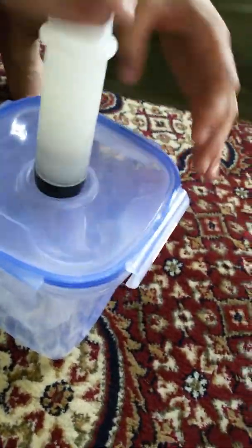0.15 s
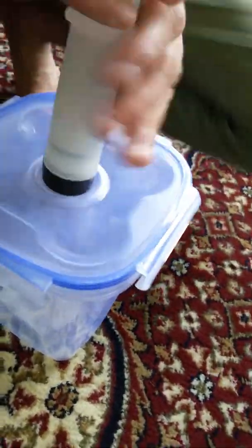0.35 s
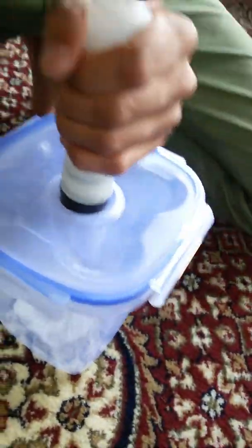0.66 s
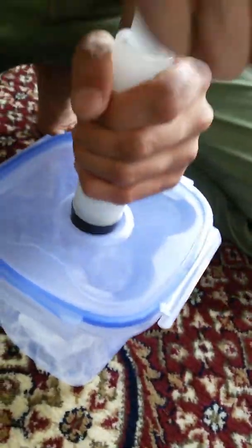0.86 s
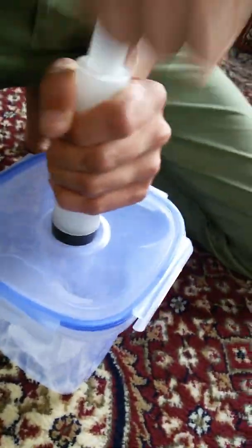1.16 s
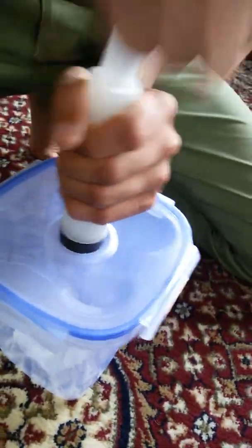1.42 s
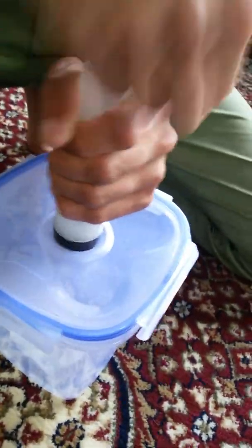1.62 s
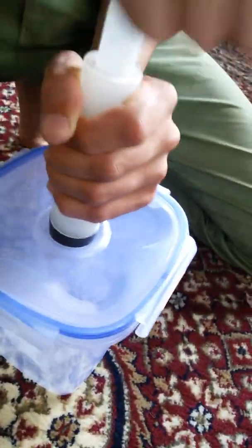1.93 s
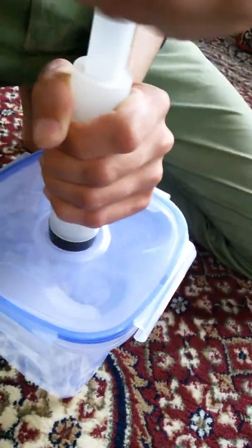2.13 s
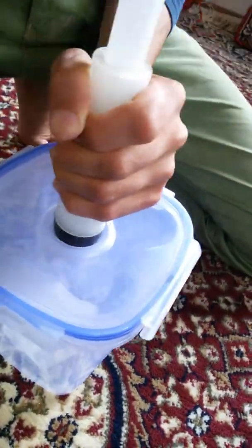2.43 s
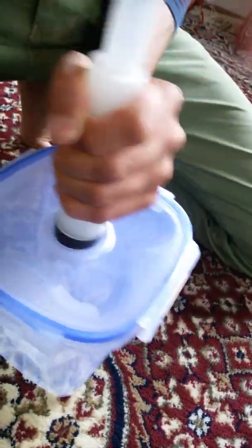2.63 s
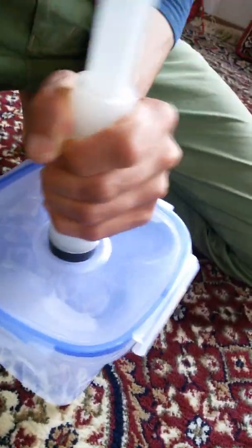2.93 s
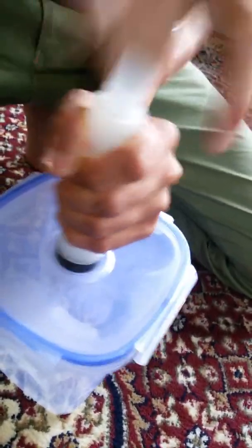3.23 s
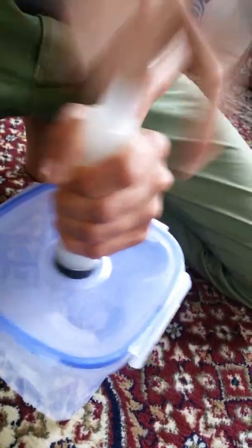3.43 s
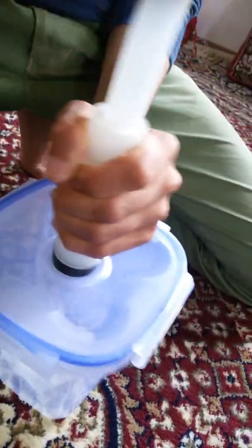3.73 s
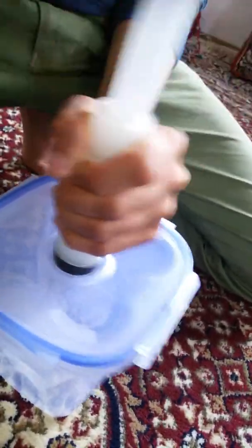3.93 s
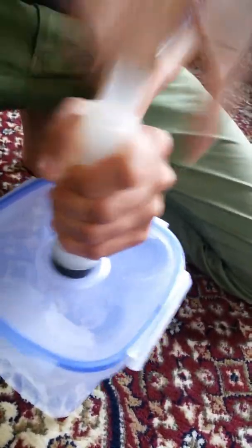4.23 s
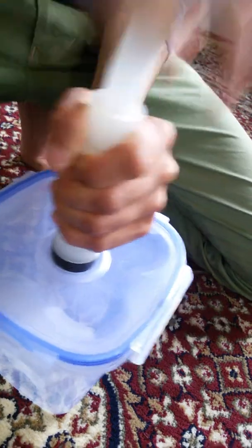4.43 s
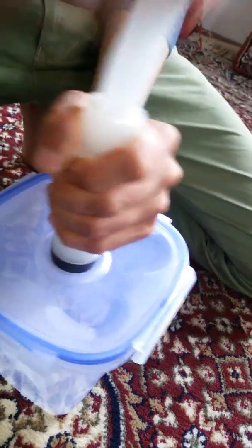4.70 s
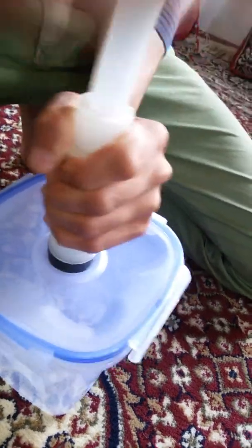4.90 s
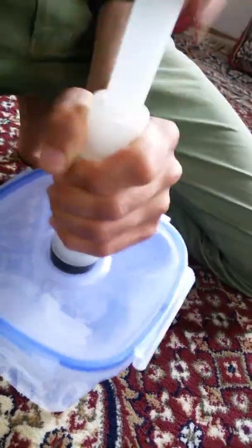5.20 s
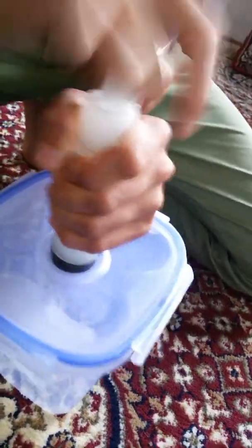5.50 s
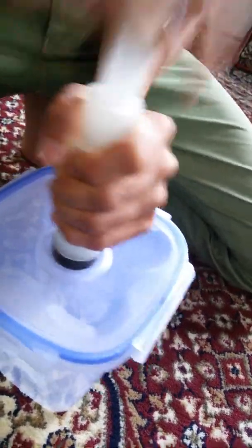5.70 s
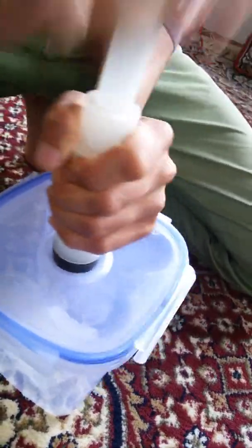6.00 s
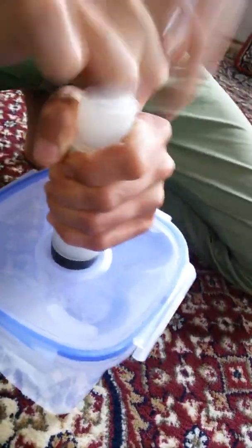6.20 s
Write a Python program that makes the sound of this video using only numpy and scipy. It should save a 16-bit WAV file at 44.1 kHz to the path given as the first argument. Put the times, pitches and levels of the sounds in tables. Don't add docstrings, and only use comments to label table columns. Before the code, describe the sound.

A hand vacuum pump on a hollow plastic box: handling knocks, a few slow strokes, then rapid rasping air hisses with sharp plastic knocks, close indoors.

```python
import sys
import numpy as np
from scipy import signal
from scipy.fft import rfft, irfft
from scipy.io import wavfile
from scipy.ndimage import uniform_filter1d, map_coordinates

SR = 44100
rng = np.random.default_rng(int(sys.argv[2]) if len(sys.argv) > 2 else 0)


def transcribe(u):
    v = np.clip(np.atleast_2d(u).T, -1, 1)
    q = np.round(v * 32767).astype(np.int16)
    wavfile.write(sys.argv[1], SR, q)


def gain_from_db(level_db):
    decades = np.asarray(level_db, float) / 20
    return 10 ** decades


N = 280198
TIME = np.arange(N) / SR

# valve_s, pull_length_s, push_hiss_db, valve_db, pull_hiss_db
STROKES = [(1.079, .098, -44, -42, -27.5), (1.33, 0.12, -44, -43, -31.5), (1.584, 0.1, -44, -44, -31.5),
           (1.817, .095, -44, -37.5, -34), (2.545, 0.091, -44, -38.5, -24.5),
           (2.778, 0.094, -41, -38.5, -24), (2.99, 0.085, -39.5, -37, -26.5),
           (3.195, 0.093, -40, -40.5, -26.5), (3.396, 0.088, -40.5, -36.5, -20),
           (3.605, 0.084, -41, -39.5, -26.5), (3.798, 0.084, -42, -35.5, -20),
           (4.003, 0.086, -38, -38, -24), (4.201, 0.079, -41.5, -35.5, -23), (4.383, 0.083, -40, -35, -23),
           (4.577, .076, -40.5, -35.5, -22.5), (4.758, 0.075, -41, -34.5, -21.5),
           (4.95, 0.08, -38, -33, -21.5), (5.128, 0.079, -36, -28.5, -21),
           (5.31, 0.075, -34.5, -30.5, -23.5), (5.49, 0.079, -37.5, -31, -21),
           (5.668, 0.075, -42.5, -33, -24), (5.849, 0.075, -40, -35.5, -26), (6.032, 0.083, -41, -38, -24),
           (6.213, 0.078, -42.5, -40.5, -26)]
# start_s, suction (0-1)
SUCTION = [(0, 0), (2.1, 0), (2.4, 1)]


def unit(x):
    return x / np.sqrt(np.mean(x ** 2) + 1e-20)


def along(points, hz):
    f, v = np.transpose(points)
    return np.interp(np.log(hz + 1), np.log(f + 1), v)


def wobble(rate_hz):
    return map_coordinates(rng.standard_normal(int(N * rate_hz / SR) + 4), [TIME * rate_hz])


def bumps(peaks, hz, depth=0):
    power = 0
    for centre_hz, width_hz, db, *rise in peaks:
        moved_hz = centre_hz * (1 + sum(rise) * depth)
        power = power + gain_from_db(2 * db) / (1 + (2 * (hz - moved_hz) / width_hz) ** 2)
    return power


def noise(gain, patchy_db, size=256):
    hz, t, z = signal.stft(rng.standard_normal(N), SR, nperseg=size)
    field = uniform_filter1d(rng.standard_normal(z.shape), size=3, axis=0)
    field = uniform_filter1d(field, size=4, axis=1)
    shape = gain(hz[:, None], t) * np.ones(z.shape)
    shape = shape / np.sqrt(np.mean(shape ** 2, axis=0))
    return unit(signal.istft(z * shape * gain_from_db(patchy_db * unit(field)), SR, nperseg=size)[1][:N])


def add(track, s, sound):
    part = track[round(s * SR):][:len(sound)]
    part += sound[:len(part)]


def ring(modes, t, attack_s):
    tones = 0
    for hz, t60_s, db in modes:
        hit_hz = hz * (1 + rng.normal(0, .012))
        tones = tones + gain_from_db(db - 60 * t / t60_s) * np.sin(2 * np.pi * hit_hz * t)
    return tones * (1 - np.exp(-(t / attack_s) ** 2))


def by_suction(pair, s):
    return pair[0] + pair[1] * np.interp(s, *np.transpose(SUCTION))


def still_air():
    # hz, db_per_hz
    floor = [(25, -29), (60, -13.5), (130, -2.5), (450, -25.5), (1600, -9), (4700, -16), (10000, -19),
             (14500, -17.5)]
    return gain_from_db(-62) * noise(lambda hz, t: gain_from_db(along(floor, hz)), patchy_db=-1.5, size=2048)


def room(x):
    # hz, t60_s
    decay = [(200, 0.4), (500, 0.37), (1200, 0.31), (4000, 0.12), (10000, 0.29)]
    out, step = np.zeros(N), SR // 8
    for start in range(0, N, step):
        hz, t, z = signal.stft(rng.standard_normal(SR // 2), SR, nperseg=256)
        tail = signal.istft(z * gain_from_db(-60 * t / along(decay, hz)[:, None]), SR, nperseg=256)[1]
        stretch = x[start:start + step]
        wet = signal.fftconvolve(stretch, tail)
        add(out, start / SR + .009, wet * np.linalg.norm(stretch) / (np.linalg.norm(wet) + 1e-12))
    return out


def hands():
    # start_s, level_db
    grasp = [
        [(0.0, -50.5), (0.16, -51.5), (0.24, -50), (0.288, -36), (0.436, -67), (0.608, -59), (0.718, -51.5),
         (0.824, -59.5), (0.95, -72)],
        [(1.98, -54), (2.034, -68), (2.106, -69), (2.296, -63), (2.39, -52), (2.45, -52)],
    ]
    # hz, width_hz, level_db
    grip = [(390, 39, 2.5), (273, 100, -6.5), (970, 290, -10.5), (700, 300, -16)]
    # hz, db_per_hz
    skin = [(710, -38), (1200, -11), (1410, 1), (2250, -11.5), (3320, -3.5), (8200, -14.5), (14000, -17.5)]
    rumble_modes = [(110, 70, 0), (220, 260, -1)]  # hz, width_hz, level_db
    grasp_db = np.interp(TIME, *np.transpose(sum(grasp, [])))
    gates_db = []
    for span in grasp:
        first_s, last_s = span[0][0], span[-1][0]
        gates_db.append(np.interp(TIME, [first_s - .02, first_s, last_s, last_s + .03], [-40, 0, 0, -40]))
    gate_db = np.max(gates_db, axis=0)
    hum_db = grasp_db + gate_db
    rustle_db = -63 + 1 * (grasp_db + 54) + gate_db
    rumble_db = -59 + .15 * (grasp_db + 54) + gate_db
    hum = noise(lambda hz, t: bumps(grip, hz) ** 0.58, patchy_db=1.5, size=1024)
    rustle = noise(lambda hz, t: gain_from_db(along(skin, hz)), patchy_db=-2.5)
    rumble = noise(lambda hz, t: bumps(rumble_modes, hz), patchy_db=1, size=4096)
    out = gain_from_db(hum_db + 4.67 * wobble(44)) * hum
    out += gain_from_db(rustle_db + 0.49 * wobble(41)) * rustle
    return out + gain_from_db(rumble_db + 2.5 * wobble(15)) * rumble


def skin_chirps():
    # start_s, length_s, pitch_hz, level_db
    chirps = [
        (.097, 0.013, 3780, -52),
        (0.216, 0.028, 3400, -57),
        (0.24, 0.011, 4700, -49),
        (.7, .04, 1490, -59),
        (.8, 0.044, 2250, -61),
    ]
    out, t = np.zeros(N), np.arange(SR // 20) / SR
    for s, length_s, pitch_hz, db in chirps:
        phase = 2 * np.pi * pitch_hz * t + np.cumsum(rng.normal(0, 0.072, len(t)))
        add(out, s, gain_from_db(db) * np.sin(np.pi * np.clip(t / length_s, 0, 1)) * np.sin(phase))
    return out


def knocks():
    # start_s, lid_db, cavity_db, crack_db
    cracked = [(0.053, -36, 4, 1), (2.422, -34, -0.5, -1), (2.488, -36, 1.5, -6), (0.266, -11, 6.5, -12),
               (1.167, 3, -7, -14.5), (2.631, 3.5, -7, -13.5), (2.747, -14, 1, -20), (3.16, 0.5, -8.5, -27.5),
               (3.374, -6, -6, -24), (3.584, -10.5, -4.5, -18), (3.777, -6, -4, -23.5),
               (3.879, 2.5, -9, -13.5), (3.973, 3, -7, -25.5), (4.825, 1, -7.5, -11.5),
               (5.021, 0.5, -9.5, -30), (5.201, 0, -11.5, -17.5)]
    # start_s, lid_db, cavity_db
    taps = [(1.082, -43.5, 15), (1.345, -47.5, 16), (1.462, -29, 5), (1.591, -39.5, 9), (1.93, -35.5, 2.5),
            (2.546, -43, 12), (2.869, -32, 8), (2.993, -30, 0.5), (3.084, -26, -3), (3.296, -29, 6.5),
            (3.494, -34.5, 10), (3.662, -22, -15), (3.7, -34, 6), (3.827, -16.5, -25), (4.289, -39.5, 12),
            (4.473, -35, 5), (4.659, -38, 10.5), (5.394, -27.5, 1), (5.576, -30, 1), (5.755, -42, 16),
            (5.932, -25, -3.5), (6.123, -33.5, 8), (6.298, -20.5, -5)]
    # start_s, lid_db, cavity_db
    fingers = [
        (0.135, -51, 18),
        (0.174, -46.5, 15),
        (0.61, -37.5, -2),
        (0.64, -39, 16),
        (0.786, -33.5, 2),
        (0.934, -37, -19.5),
        (2.065, -41.5, 10),
        (2.191, -48, 11.5),
        (2.266, -57, 20.5),
        (2.318, -44.5, 3.5),
    ]
    # hz, t60_s, level_db
    lid = [(1021.5, 0.028, 3.5), (918.6, 0.02, -2), (1120, 0.0025, -23), (664, 0.072, -16.5)]
    # hz, t60_s, level_db
    cavity = [(448.6, 0.037, 5.5), (428.5, 0.05, -2.5), (229, 0.034, -9.5)]
    tap_crack_db, finger_crack_db = (-60, 23.5), -53
    knock_s, tap_s, finger_s = 0.0017, 0.0022, 0.0025
    out, t = np.zeros(N), np.arange(SR // 4) / SR
    sharp = signal.butter(2, [1800, 4800], "bandpass", fs=SR)
    walls = signal.butter(3, [330, 1200], "bandpass", fs=SR)
    hits = [(*row, knock_s) for row in cracked]
    hits += [(s, db, air_db, by_suction(tap_crack_db, s) - db, tap_s) for s, db, air_db in taps]
    hits += [(s, db, air_db, finger_crack_db - db, finger_s) for s, db, air_db in fingers]
    for s, db, cavity_db, crack_db, contact_s in sorted(hits):
        crack = signal.lfilter(*sharp, rng.standard_normal(len(t))) * gain_from_db(crack_db + 6 - 60 * t / .016)
        body = gain_from_db(0.5) * ring(lid, t, contact_s)
        body = body + gain_from_db(cavity_db + 4) * ring(cavity, t, 3.17 * contact_s)
        body = body * gain_from_db(-6 * (t / 0.013) ** 2)
        shudder = unit(signal.lfilter(*walls, rng.standard_normal(len(t))))
        shudder = shudder * gain_from_db(-26 - 60 * t / 0.25) * (1 - np.exp(-t / 0.016))
        add(out, s - .0006, gain_from_db(db) * (body + crack + shudder))
    return out


def seal():
    # start_s, length_s, level_db
    chatter = [(0.237, 0.016, -46), (2.945, 0.011, -25.5), (3.137, .012, -25.5), (4.716, 0.013, -24.5),
               (3.346, 0.01, -22), (3.554, 0.013, -23.5), (4.534, 0.015, -22), (5.097, 0.014, -22),
               (5.453, 0.013, -27), (5.808, 0.016, -26.5), (5.982, 0.017, -24.5)]
    # start_s, pitch_hz, level_db
    squeak = [
        (.515, 1460, -90),
        (.53, 1462, -66),
        (.572, 1540, -69),
        (.6, 1700, -65),
        (.635, 1695, -68),
        (.655, 1620, -68),
        (.7, 1570, -69),
        (.72, 1550, -90),
    ]
    out, t = np.zeros(N), np.arange(SR // 20) / SR
    for s, length_s, db in chatter:
        swell = (1 - np.exp(-t / 0.00094)) * gain_from_db(-60 * np.clip(t - length_s, 0, 1) / 0.0039)
        lid_hz = 1045 * (1 + rng.normal(0, 0.03))
        add(out, s, gain_from_db(db - 5) * swell * np.sin(2 * np.pi * lid_hz * t))
    s, hz, db = np.transpose(squeak)
    pitch_hz = np.interp(TIME, s, hz) * (1 + 0.0029 * wobble(84))
    phase = 2 * np.pi * np.cumsum(pitch_hz) / SR
    level_db = np.interp(TIME, s, db, -200, -200) + 2.5 * wobble(60) + 1.5
    return out + gain_from_db(level_db) * (np.sin(2 * phase) + .15 * np.sin(3 * phase))


def valve():
    # start_s, tilt_db_per_octave
    flap_tilt = [(1.0, 9), (3.7, 6), (4.0, 0), (6.3, 2)]
    flap_modes = [(192.7, 0.017, 2.5), (141.0, 0.03, -12.0)]  # hz, t60_s, level_db
    spit_db = (3.5, 7)
    out, t = np.zeros(N), np.arange(SR // 20) / SR
    hz = np.fft.rfftfreq(len(t), 1 / SR) + 1
    for s, _, _, thump_db, _ in STROKES:
        air_db = thump_db + by_suction(spit_db, s)
        tilt_db = np.interp(s, *np.transpose(flap_tilt))
        thump = gain_from_db(thump_db + 14) * ring(flap_modes, t, 0.0026)
        colour = gain_from_db(tilt_db * np.log2(hz / 4000)) / (1 + (1200 / hz) ** 4) / (1 + (hz / 9000) ** 2)
        colour = colour * (0.5 + bumps([(6700, 590, tilt_db + 1.5)], hz)) ** .5
        air = unit(irfft(rfft(rng.standard_normal(len(t))) * colour, len(t)))
        add(out, s - .004, thump + gain_from_db(air_db - 8.5) * air * np.exp(-((t - .007) / 0.0039) ** 2))
    return out


def pushes():
    # start_s, length_s, hiss_db
    sinking = [
        (1.95, .086, -52),
        (6.314, .16, -47),
    ]
    turn_s, first_push_s = 0.037, (.115, -0.059)
    pause_s = (-0.0026, 0.034)
    fade_db = (5, -5.5)
    rows, free_s = [(*row, 11.5, .25) for row in sinking], -1
    for s, length_s, db, _, _ in STROKES:
        end_s = s - by_suction(pause_s, s)
        start_s = free_s + turn_s if s - free_s < .3 else end_s - by_suction(first_push_s, s)
        rows.append((start_s, max(end_s - start_s, .02), db, by_suction(fade_db, s), 1))
        free_s = s + length_s
    return rows


def strokes():
    rise_s, fall_s = (0.035, 0.0044), 0.019
    push_hum_db = (0.5, 1)
    hiss, hum, depth = np.zeros(N), np.zeros(N), []
    for s, length_s, _, _, db in STROKES:
        peak_s, swell_s = s + length_s - fall_s, by_suction(rise_s, s)
        u = TIME - peak_s
        bell = gain_from_db(db - 3 - 10 * np.abs(u / np.where(u < 0, swell_s, fall_s)) ** 2.2)
        hiss += bell ** 2
        hum += (bell ** 0.45 * gain_from_db(0.33 * db - 14)) ** 2
        depth += [(peak_s - swell_s, .75), (peak_s + fall_s / 4, .03)]
    for s, length_s, db, fade_db, reach in pushes():
        u = (TIME - s) / length_s
        before = np.clip(-u * length_s / 0.03, 0, 9)
        after = np.clip((u - 1) * length_s / 0.019, 0, 9)
        gate = gain_from_db(-9 * (before ** 2 + after ** 2))
        faded_db = fade_db * np.clip(2 * u - 1, -.5, .5)
        hiss += (gate * gain_from_db(db - 1.5 - faded_db)) ** 2
        hum += (gate ** .5 * gain_from_db(db + by_suction(push_hum_db, s) - 1 - 0.7 * faded_db)) ** 2
        depth += [(s, 0), (s + .7 * length_s, .9 * reach), (s + length_s, reach)]
    return np.sqrt(hiss), np.sqrt(hum), np.transpose(sorted(depth))


def pump():
    # hz, width_hz, level_db, rise_when_in (0-1)
    column_modes = [(2350, 200, 16, .78), (4350, 240, 15, .2), (5400, 240, 16, .02), (6500, 300, 13, .05)]
    # hz, width_hz, level_db
    nozzle = [(8600, 700, 2), (2800, 700, 5), (4300, 600, 3), (5500, 600, 2)]
    # hz, db_per_hz
    jet = [(760, -42), (1300, -3.5), (2900, -4.5), (4910, -7), (5380, -7), (5950, -5.5), (12000, 0.5),
           (14700, -0.5)]
    # hz, width_hz, level_db
    box_modes = [(448.5, 99, -1.5), (716, 110, -11), (877, 110, -7), (1068, 205, -3), (201.6, 32, -4)]
    # hz, db_per_hz
    shake = [(15, -71), (25, -42), (59, -46.5), (96, -10.5), (173, -6.5), (330, -8), (430, -33),
             (730, -120)]
    hiss, hum, depth = strokes()

    def slowness(t):
        return np.clip(-np.log10(np.interp(t, TIME, hiss) + 1e-4) - 1.4, 0, 1)

    def column(hz, t):
        slow = slowness(t)
        muted = gain_from_db(-30 * slow * by_suction((0, 1), t))
        low = gain_from_db(slow * np.clip(4 - 22 * np.log2((hz + 1) / 4300), -12, 4))
        return muted * bumps(column_modes, hz, np.interp(t, *depth)) * low

    def jet_gain(hz, t):
        dull = gain_from_db(by_suction((-6, -8), t) * slowness(t) * np.clip(np.log2((hz + 1) / 6000), 0, 3))
        return gain_from_db(along(jet, hz)) * dull * (1 + column(hz, t) + bumps(nozzle, hz)) ** .57

    air = noise(jet_gain, patchy_db=2.5)
    sputter = gain_from_db(1.6 * wobble(350) + 1.5 * wobble(80))
    box = noise(lambda hz, t: bumps(box_modes, hz), patchy_db=3, size=1024)
    judder = gain_from_db(4.2 * wobble(45))
    thud = noise(lambda hz, t: gain_from_db(along(shake, hz)), patchy_db=-4.5, size=4096)
    thud = hum ** 0.51 * gain_from_db(-37 + 3.5 * wobble(18)) * thud
    return hiss * unit(air * sputter) + hum * unit(box * judder) + thud


def scene():
    blows = knocks() + valve() + seal() + skin_chirps()
    air = pump()
    behind = gain_from_db(-14) * room(blows) + gain_from_db(-12) * room(air)
    return (blows + air + behind + hands() + still_air())[None]


def starve(x):
    # hz, share (0-1)
    empty = [(6500, 0), (8000, .025), (10000, .1), (13000, .22), (14500, .45)]
    hz, t, z = signal.stft(x, SR, nperseg=1024)
    loud = np.clip(np.log10(np.sum(np.abs(z) ** 2, axis=0) + 1e-12) / 1.5 + 3.6, .1, 1.6)
    dice = rng.random((len(hz) // 5 + 1, len(t) // 4 + 1)).repeat(5, axis=0).repeat(4, axis=1)
    kept = dice[:len(hz), :len(t)] > along(empty, hz)[:, None] * loud
    return signal.istft(z * kept, SR, nperseg=1024)[1][:N]


def low_pass(x):
    return signal.sosfilt(signal.butter(12, 14830, fs=SR, output="sos"), x)


def record(dry):
    x = signal.sosfilt(signal.butter(2, 60, "highpass", fs=SR, output="sos"), dry)
    x = signal.sosfiltfilt(signal.butter(16, 14550, fs=SR, output="sos"), x)
    x = starve(x[0])[None]
    x = x / (1 + np.abs(x / .995) ** 40) ** (1 / 40)
    return low_pass(x)


dry = scene()
out = record(dry)
transcribe(out)
```